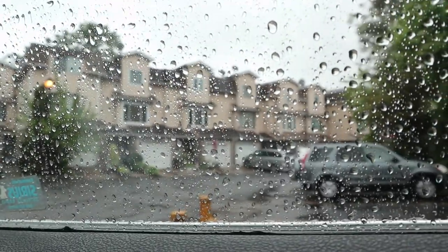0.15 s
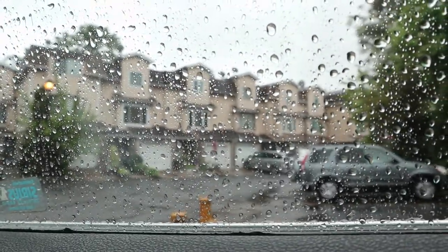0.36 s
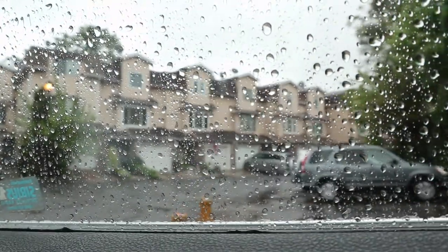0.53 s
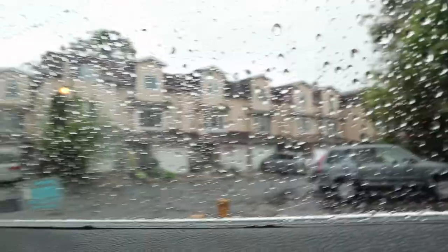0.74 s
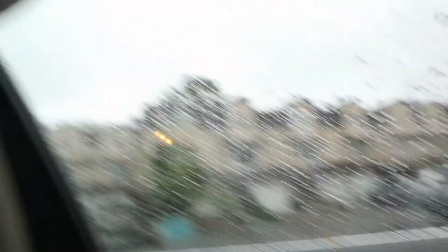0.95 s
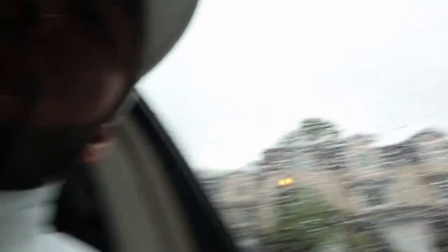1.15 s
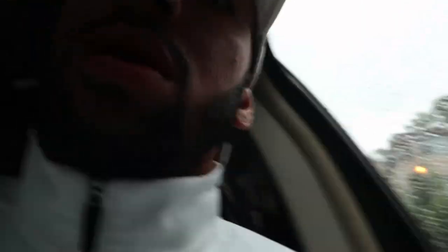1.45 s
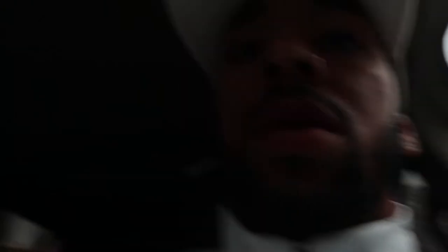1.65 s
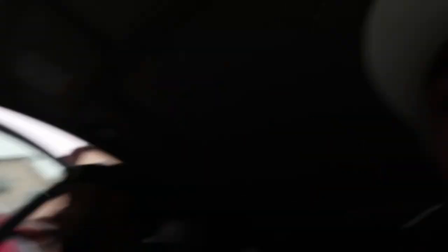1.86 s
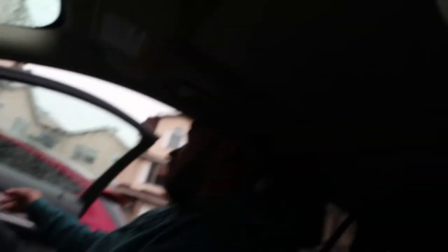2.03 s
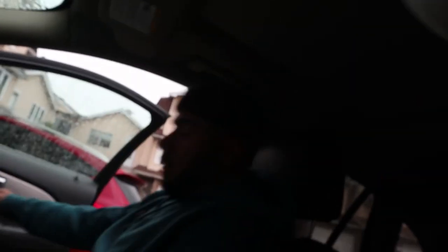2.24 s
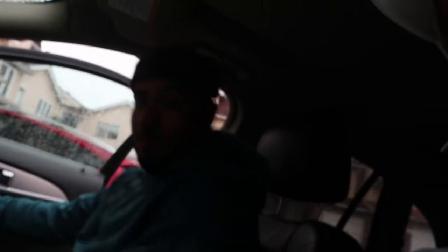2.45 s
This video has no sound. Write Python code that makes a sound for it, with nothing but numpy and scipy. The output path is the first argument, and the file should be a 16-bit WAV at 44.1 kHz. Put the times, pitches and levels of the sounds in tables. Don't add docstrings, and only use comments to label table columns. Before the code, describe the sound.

A car door opens from inside a parked car. The cabin is quiet and boomy with muffled rain until a hard latch knock and deep panel thump at 0.25 s, with brief rattle and faint squeaks. Around 0.83 s the door releases, and bright, hissing rain enters. From 1.3 s cloth rubs the seat; knocks and clacks crowd 1.55-1.9 s, then a snap near 2.13 s and lighter movement until 2.6 s.

```python
import sys
import numpy as np
from scipy import signal
from scipy.fft import rfft, irfft, next_fast_len
from scipy.io import wavfile

SR = 44100
rng = np.random.default_rng(int(sys.argv[2]) if len(sys.argv) > 2 else 0)


def natural_amplitude(level_db):
    exponent = np.asarray(level_db, float) / 20
    return 10 ** exponent


def generate_wav(sig):
    pcm = np.round(np.clip(np.atleast_2d(sig).T, -1, 1) * 32767).astype(np.int16)
    wavfile.write(sys.argv[1], SR, pcm)


N = 114660


def rms_one(x):
    return x / np.sqrt(np.mean(x ** 2) + 1e-20)


def level(rows):
    s, db = np.transpose(rows)
    return natural_amplitude(np.interp(np.arange(N) / SR, s, db))


def at_hz(points, hz):
    p = np.array(points, float)
    return np.interp(np.log(hz), np.log(p[:, 0] + 1), p[:, 1])


def drift(rate_hz):
    step = 40
    r = np.exp(-2 * np.pi * step * rate_hz / SR)
    settle = 2000
    noise = rng.standard_normal(N // step + settle + 2)
    slow = signal.lfilter([1], [1, -2 * r, r * r], noise)[settle:]
    return np.interp(np.arange(N) / step, np.arange(len(slow)), rms_one(slow))


def grains(per_s, spread_db, size):
    size_db = spread_db * np.minimum(rng.exponential(1, size), 5)
    hit = (rng.random(size) < per_s / SR) * natural_amplitude(size_db)
    return rms_one(hit * rng.standard_normal((2, size)))


def resonance(x, hz, width_hz):
    r = np.exp(-np.pi * width_hz / SR)
    gain = (1 - r * r) / 2
    return signal.lfilter([gain, 0, -gain], [1, -2 * r * np.cos(2 * np.pi * hz / SR), r * r], x)


def low_pass(x, hz):
    return signal.sosfilt(signal.butter(2, hz, fs=SR, output="sos"), x)


def coloured(sources, spectrum, patchy_db, flicker_hz):
    low, top = spectrum[0][0], spectrum[-1][0]
    edges = np.geomspace(low, min(top, .45 * SR), int(2 * np.log2(top / low)) + 2)
    out, together = 0, drift(flicker_hz / 3)
    for k, (a, b) in enumerate(zip(edges, edges[1:])):
        band = signal.sosfilt(signal.butter(2, [a, b], "band", fs=SR, output="sos"), sources[k % 2])
        wander_db = patchy_db * (.5 * together + drift(flicker_hz))
        out = out + band * natural_amplitude(at_hz(spectrum, np.sqrt(a * b)) + wander_db)
    return rms_one(out)


# (time [s], level [dB])
DOOR_RAIN_LEVEL = [(0, -61), (.82, -61.5), (.9, -46), (1.05, -44.5), (1.2, -45), (1.9, -48), (2.3, -46),
                   (2.6, -48)]
# (frequency [Hz], level per Hz [dB])
DOOR_RAIN_COLOUR = [(400, -5), (1200, 4), (2000, 1.5), (5000, -4), (9500, -15.5), (12000, -11),
                    (14000, -21), (15600, -42)]
# (frequency [Hz], level per Hz [dB])
ROOF_COLOUR = [(300, -45), (600, 1), (1900, -2), (4000, -19), (7500, -59), (13000, -66)]


def rain():
    drops_per_s, drop_spread_db, hiss_share, roof_db = 6700, -3.5, 0.67, -60
    sources = []
    for _ in range(2):
        hiss = rng.standard_normal((2, N))
        drops = grains(drops_per_s, drop_spread_db, N)
        sources.append(hiss_share * hiss + (1 - hiss_share) * drops)
    roof = natural_amplitude(roof_db) * coloured(sources[::-1], ROOF_COLOUR, patchy_db=1.2, flicker_hz=12.0)
    door = level(DOOR_RAIN_LEVEL) * coloured(sources, DOOR_RAIN_COLOUR, patchy_db=.9, flicker_hz=9.0)
    return door + roof


# (time [s], level [dB])
SHUDDER_LEVEL = [(0, -39), (.23, -41.5), (.27, -23), (.46, -41.5), (.6, -51), (.8, -48), (.88, -34.5),
                 (1.1, -44), (1.3, -38.5), (1.55, -29), (1.7, -32.5), (1.9, -24), (2.0, -35), (2.3, -32),
                 (2.4, -39.5), (2.6, -37)]
# (frequency [Hz], level per Hz [dB])
AIR_COLOUR = [(18, -22), (30, -38), (48, 23), (70, -10.5), (100, -43)]
# (frequency [Hz], level per Hz [dB])
FRAME_COLOUR = [(70, -1.5), (130, 0), (200, -4.5), (280, -11.5), (400, -21)]


def boom():
    air_db = -40.5
    air = coloured(rng.standard_normal((2, 2, N)), AIR_COLOUR, patchy_db=.9, flicker_hz=6.0)
    frame = coloured(rng.standard_normal((2, 2, N)), FRAME_COLOUR, patchy_db=1.8, flicker_hz=22.0)
    return natural_amplitude(air_db) * air + level(SHUDDER_LEVEL) * frame


# (time [s], level [dB])
CLOTH_LEVEL = [(0, -47.5), (.27, -64), (.4, -48.5), (.5, -69), (.62, -51), (.75, -54), (1.15, -57.5),
               (1.3, -40.5), (1.4, -34.5), (1.47, -30.5), (1.56, -28), (1.6, -30), (1.66, -28), (1.76, -33),
               (1.9, -40.5), (2.12, -37), (2.3, -39.5), (2.6, -35.5)]
# (frequency [Hz], level per Hz [dB])
CLOTH_COLOUR = [(300, 4), (600, 9), (1100, 2.5), (2000, 2.5), (4000, -5), (8000, -23), (11000, -15)]


def cloth():
    fibres_per_s, fibre_spread_db, clump_db = 3000, 2, 1.2
    sources = [grains(fibres_per_s, fibre_spread_db, N) for _ in range(2)]
    clumps = natural_amplitude(clump_db * drift(30.0))
    return level(CLOTH_LEVEL) * clumps * coloured(sources, CLOTH_COLOUR, patchy_db=1.5, flicker_hz=26.0)


def knocks(rows, cut_hz):
    low_hz, ticks_per_s, rise_share, fall_s = 313, 12000, 0.22, 0.011
    ring_db, ring_q = 4.5, 2.67
    out, t = np.zeros((2, N + SR)), np.arange(SR // 8) / SR
    for s, db, hz, length in rows:
        rise = np.clip(t / (rise_share * length), 0, 1) ** 2
        fall = np.exp(-np.maximum(t - length, 0) / fall_s)
        ticks = grains(ticks_per_s, 0.42, len(t)) * rise * fall
        broad = signal.sosfilt(signal.butter(1, [low_hz, cut_hz], "band", fs=SR, output="sos"), ticks)
        broad = low_pass(broad, cut_hz)
        ring = 2 * resonance(ticks, hz, hz / ring_q) - 2.15 * resonance(ticks, hz * 0.42, hz / ring_q)
        x = broad + natural_amplitude(ring_db) * ring
        sounding = x[:, :int((length + fall_s) * SR)]
        i = int(s * SR)
        out[:, i:i + len(t)] += natural_amplitude(db - 11.5) * x / np.sqrt(np.mean(sounding ** 2))
    return out[:, :N]


# (time [s], peak level [dB], ring
# frequency [Hz], length [s])
SCUFFS = [(.232, -29, 2600, 0.0056),  (1.224, -32.5, 960, 0.0049), (1.284, -46, 567, 0.0058),
          (1.385, -30.5, 1650, 0.018), (1.505, -46, 1360, 0.035), (1.613, -9, 580, 0.014),
          (1.65, -11, 1540, 0.018), (1.708, -34, 825, 0.017), (1.852, -11, 1090, 0.0064),
          (1.878, -21, 2380, 0.0023), (2.044, -25.5, 435, 0.005), (2.091, -31, 1090, 0.0044),
          (2.177, -18.5, 1280, 0.0069), (2.3, -24.5, 620, 0.026), (2.548, -29, 1810, 0.0064)]


def scuffs():
    return knocks(SCUFFS, cut_hz=3000)


def cabin(x):
    wet_db, t60_s, cut_hz = -18, 0.19, 3800
    t = np.arange(SR // 2) / SR
    tail = rng.standard_normal((2, len(t))) * natural_amplitude(-60 * t / t60_s) * np.clip(t / 0.0012, 0, 1)
    tail = low_pass(tail, cut_hz)
    tail = tail / np.sqrt(np.sum(tail[0] ** 2))
    return natural_amplitude(wet_db) * signal.fftconvolve(x, tail, axes=1)[:, :N]


# (time [s], peak level [dB], pitch [Hz], t60 [s])
THUMPS = [(0.2368, -18, 147, 0.087), (.245, 0, 196.4, 0.052), (.247, -10.5, 278, .05),
          (.445, -26, 195, 0.038), (0.257, -15.5, 110.5, 0.14), (0.279, -12.5, 141.2, 0.3),
          (0.334, -21.5, 133.6, 0.055), (0.424, -17.5, 58, 0.15), (0.828, -11, 237, 0.058),
          (0.855, -10, 220, 0.039), (0.885, -27, 180.5, 0.38), (1.008, -22.5, 191, 0.061),
          (1.22, -18.5, 146.5, 0.065), (1.328, -19, 53.8, 0.3), (1.47, -20, 112, 0.055),
          (1.541, -15.5, 178.5, 0.12), (1.577, -13, 109, 0.079), (1.618, -10.5, 132.4, 0.13),
          (1.647, -16.5, 88.4, 0.16), (1.679, -23, 172, 0.13), (1.77, -27, 148, 0.17),
          (1.8085, -16, 145, 0.076), (1.857, -7.5, 174, 0.073), (1.868, -19, 184, 0.12),
          (2.0436, -20, 172, 0.078), (2.075, -38, 116, 0.081), (2.132, -18.5, 148, 0.022),
          (2.178, -20.5, 125, 0.04), (2.252, -26, 115.4, 0.33), (2.295, -15, 97, 0.075)]


def thumps():
    rise_cycles, hold_cycles, roughness = 1.29, 0.96, 0.32
    partner_ratio, partner_db = 1.356, -11.5
    out, t = np.zeros(N + SR), np.arange(SR // 2) / SR
    for s, db, hz, t60 in THUMPS:
        rise = np.sin(np.pi / 2 * np.clip(t * hz / rise_cycles, 0, 1)) ** 2
        fall = natural_amplitude(-60 * np.maximum(t - hold_cycles / hz, 0) / t60)
        mode = np.sin(2 * np.pi * hz * t)
        partner = natural_amplitude(partner_db) * fall * np.sin(2 * np.pi * hz * partner_ratio * t)
        i = int(s * SR)
        out[i:i + len(t)] += natural_amplitude(db) * rise * fall * (mode + partner) / np.max(rise * fall)
    wobble = 1 + roughness * np.tanh(drift(88.0))
    return out[:N] * wobble * np.ones((2, 1))


# (time [s], peak level [dB], ring frequency [Hz], length [s])
SNAPS = [
    (.243, -23.5, 3050, 0.0072),
    (.8255, -28, 2130, 0.0013),
    (.859, -22.5, 2040, 0.0053),
    (1.131, -40, 1620, 0.002),
    (2.129, -24.5, 1150, 0.0047),
]


def snaps():
    return knocks(SNAPS, cut_hz=8330)


# (frequency [Hz], level [dB], t60 [s])
LATCH_PARTS = [(330, -1.5, 0.35), (490, -2, 0.23), (662, -8, 0.35), (820, -11.5, 0.4), (955, -8, 0.35),
               (1210, -7, 0.36), (1620, -9.5, 0.25), (2170, -7.5, 0.19), (3250, -11.5, 0.15)]


def latch_tail():
    latch_s, latch_db = .246, -25
    out, t = np.zeros((2, N)), np.arange(SR // 2) / SR
    i = int(latch_s * SR)
    for hz, db, t60 in LATCH_PARTS:
        rattle = resonance(grains(1000, 3.8, len(t)), hz, 7e-05 * hz ** 2)
        rattle = rms_one(resonance(rattle, hz, hz / 2))
        out[:, i:i + len(t)] += natural_amplitude(latch_db + db - 60 * t / t60) * rattle * np.clip(t / 0.0031, 0, 1)
    return out


# (time [s], peak level [dB], ring frequency [Hz], t60 [s])
TAPS = [(.2465, -13.5, 1026, 0.026), (.2555, -13.5, 915, 0.012), (.262, -29, 920, 0.039),
        (.826, -29.5, 830, 0.022), (.861, -20, 1174, 0.022), (.992, -29, 940, 0.045),
        (1.095, -39, 475, 0.02), (1.132, -34, 1560, 0.021), (1.163, -39, 1960, 0.065),
        (1.179, -38, 1510, 0.044), (1.191, -39, 2080, 0.028), (1.224, -33.5, 890, 0.025),
        (1.243, -32.5, 1470, 0.033), (1.264, -35, 1550, 0.017), (1.285, -31.5, 330, 0.034),
        (1.362, -25, 1790, 0.023), (1.385, -25.5, 1510, 0.093), (1.396, -27, 2420, 0.06),
        (1.407, -27.5, 1940, 0.055), (1.484, -29, 2520, 0.018), (1.503, -32, 1620, 0.043),
        (1.51, -22, 1420, 0.04), (1.532, -33, 2160, 0.025), (1.55, -28, 2350, 0.032),
        (1.558, -19, 910, 0.037), (1.567, -15, 814, 0.036), (1.574, -22.5, 2210, 0.03),
        (1.6145, -17, 608, 0.024), (1.664, -11.5, 581, 0.01), (1.667, -17.5, 1923, 0.083),
        (1.684, -15.5, 1980, 0.02), (1.708, -17, 720, 0.03), (1.731, -17, 1810, 0.024),
        (1.745, -29, 3340, .02), (1.856, -13.5, 562, 0.013), (2.044, -25, 620, 0.012),
        (2.092, -35.5, 1130, 0.033), (2.112, -23.5, 1920, 0.016), (2.1294, -15.5, 2150, .015),
        (2.143, -22, 1773, 0.018), (2.178, -22.5, 829, 0.042), (2.481, -39, 1740, 0.021)]


def taps():
    overtone_ratios, overtone_db, click_db, side_share = (1.34, 2.1, 3.6), -7.0, -27.5, 0.35
    out, t = np.zeros((2, N + SR)), np.arange(SR // 10) / SR
    for s, db, hz, t60 in TAPS:
        fall = natural_amplitude(-60 * t / t60) * np.clip(t * hz / 0.86, 0, 1)
        ring = np.sin(2 * np.pi * hz * t) * [[1], [side_share]]
        x = ring + natural_amplitude(click_db) * fall ** 2 * rng.standard_normal((2, len(t)))
        for k, ratio in enumerate(overtone_ratios):
            level_chance, pitch_chance = rng.normal(0, 1, 2)
            gain = natural_amplitude(overtone_db * (2 + k / 2) + 3.3 * level_chance)
            overtone_hz = hz * ratio * (1 + 0.048 * pitch_chance)
            x = x + gain * fall * np.sin(2 * np.pi * overtone_hz * t)
        i = int(s * SR)
        out[:, i:i + len(t)] += natural_amplitude(db) * fall * x / fall.max()
    return out[:, :N]


# (time [s], length [s], level [dB], frequency [Hz], sharpness Q [1])
SQUEAKS = [
    (.3, .13, -59, 3860, 24),
    (.348, .03, -57, 4950, 18),
    (.365, .065, -58, 2730, 12),
    (.405, .025, -50, 1450, 8),
    (.432, .05, -52, 1450, 12),
    (.3, .04, -64, 4480, 16),
    (1.342, .17, -41, 3700, 9),
    (1.97, .07, -39, 700, 6),
    (1.31, .1, -41, 1800, 6),
]


def squeaks():
    out = np.zeros((2, N))
    for s, length, db, hz, q in SQUEAKS:
        n, i = int(length * SR), int(s * SR)
        x = rng.standard_normal((2, SR // 4))
        x = resonance(resonance(x, hz, hz / q), hz, hz / q)
        out[:, i:i + n] += natural_amplitude(db) * rms_one(x)[:, -n:] * np.sqrt(np.hanning(n))
    return out


# (time [s], peak level [dB], ring frequency [Hz], length [s])
CLACKS = [(.555, -42.5, 868, 0.0074), (.608, -33, 2820, 0.02), (.665, -39, 1890, 0.0032),
          (.85, -20, 2510, 0.0061), (1.813, -25, 2350, 0.023), (.987, -27.5, 937, 0.0081),
          (1.548, -16.5, 2140, 0.019), (1.566, -12.5, 1480, 0.0062), (1.721, -14.5, 2330, 0.023),
          (2.111, -23, 1830, 0.005), (2.1295, -17.5, 930, 0.005), (2.585, -25, 3570, 0.0029)]


def clacks():
    return knocks(CLACKS, cut_hz=4800)


# (frequency [Hz], side minus mid [dB])
SIDE_SHARE = [(40, -34), (200, -34), (330, -19), (700, -14), (1400, -10.5), (2800, -6.5), (5500, 1),
              (9000, 6), (15000, 8)]


def scene():
    hits = scuffs() + snaps() + taps() + clacks()
    mid, side = rain() + boom() + cloth() + hits + cabin(hits) + thumps() + latch_tail() + squeaks()
    size = next_fast_len(N + 4096)
    hz = np.arange(size // 2 + 1) * SR / size + 1
    side = irfft(rfft(side, size) * natural_amplitude(at_hz(SIDE_SHARE, hz)), size)[:N]
    side = side + 0.021 * hits[0]
    return np.array([mid + side, mid - side])


def band_limit(x):
    return signal.sosfilt(signal.butter(12, 15600, fs=SR, output="sos"), x)


def record(dry):
    mic_top_hz = 16300
    mix = signal.sosfilt(signal.cheby2(10, 60, mic_top_hz, fs=SR, output="sos"), dry)
    return band_limit(mix)


dry = scene()
out = record(dry)
generate_wav(out)
```